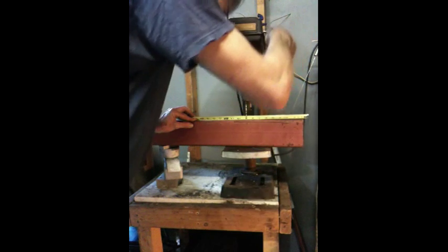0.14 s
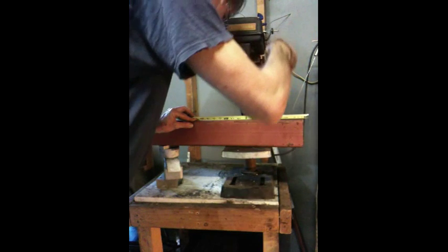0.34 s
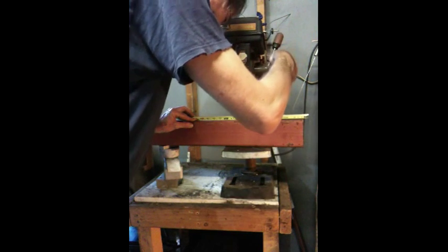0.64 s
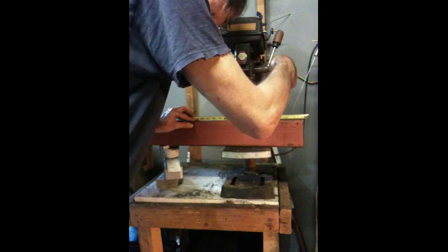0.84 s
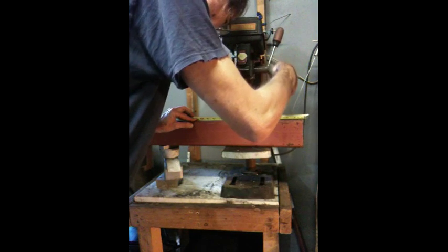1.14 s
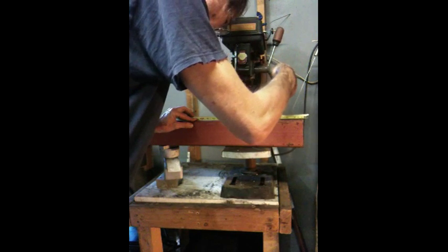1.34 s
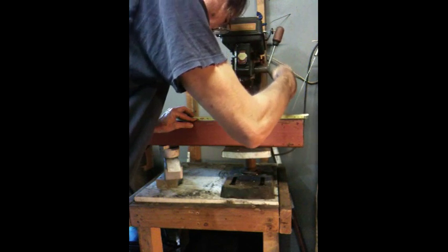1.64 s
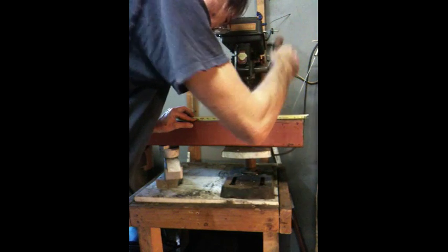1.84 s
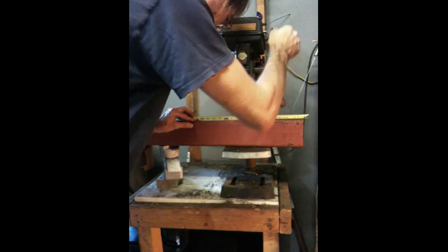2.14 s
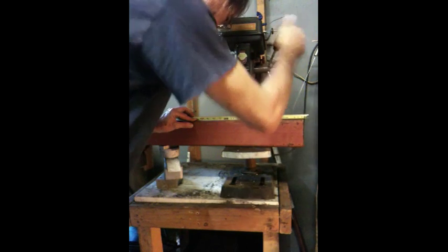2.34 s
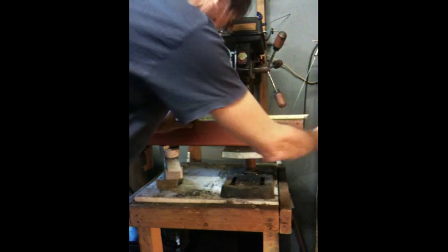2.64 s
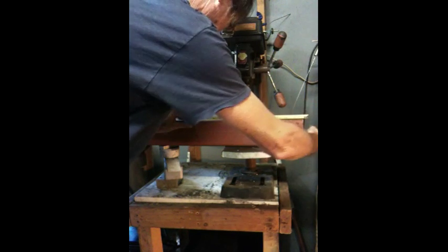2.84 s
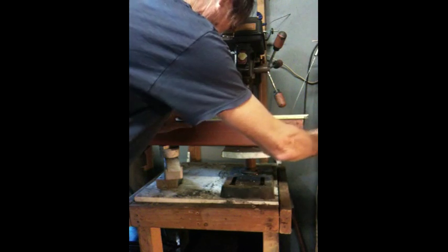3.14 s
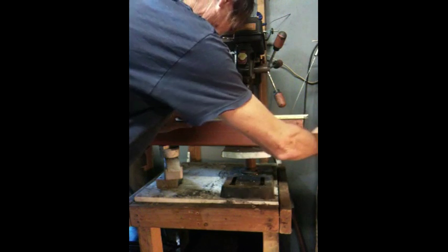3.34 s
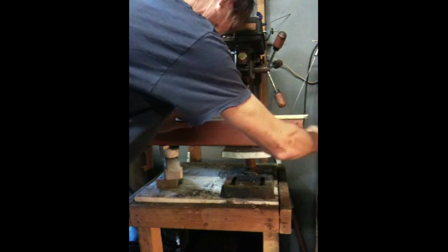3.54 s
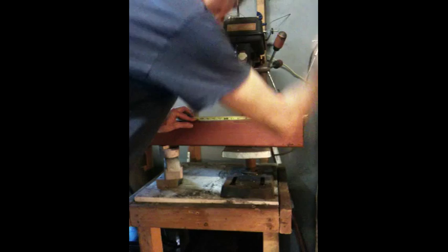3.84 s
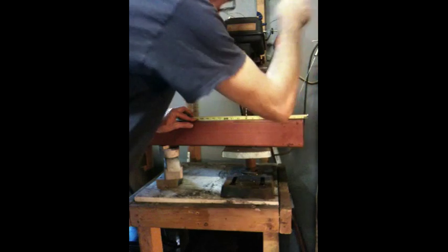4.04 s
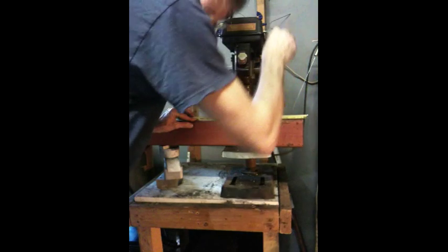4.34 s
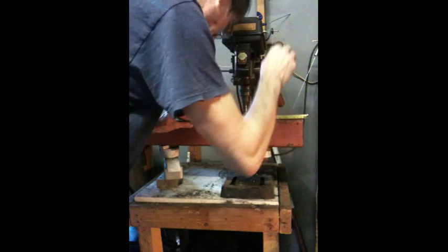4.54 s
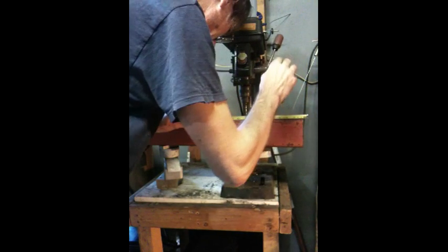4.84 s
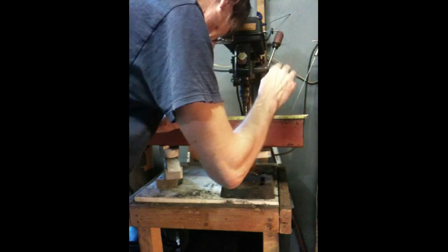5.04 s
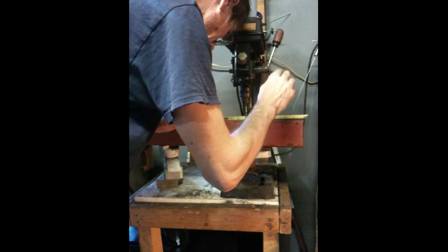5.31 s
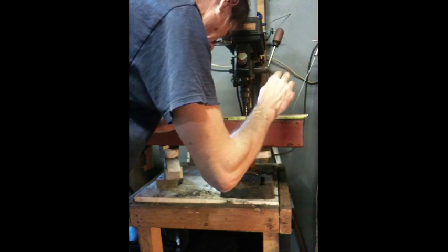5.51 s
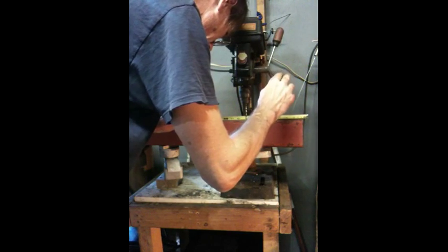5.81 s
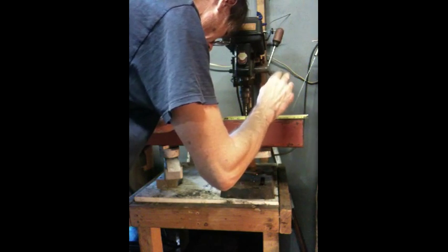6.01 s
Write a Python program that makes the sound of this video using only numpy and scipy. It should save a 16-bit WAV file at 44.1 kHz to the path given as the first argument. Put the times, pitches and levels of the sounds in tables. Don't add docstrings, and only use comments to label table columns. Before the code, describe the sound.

After a quick rattle and clank, a workshop motor hums and whooshes on without change, its housing ringing, with dull wooden thuds midway.

```python
import sys
import numpy as np
from scipy import signal
from scipy.fft import rfft, irfft
from scipy.io import wavfile
from scipy.ndimage import uniform_filter1d

SR = 44100
rng = np.random.default_rng(int(sys.argv[2]) if len(sys.argv) > 2 else 0)


def how_loud(loudness_db):
    steps = np.asarray(loudness_db, float) / 20
    return 10 ** steps


def waveform_to_disk(signal):
    frames = np.transpose(np.atleast_2d(signal))
    scaled = np.clip(frames, -1, 1) * 32767
    samples = np.round(scaled).astype(np.int16)
    wavfile.write(sys.argv[1], SR, samples)


N = 272097


# (frequency [Hz], width [Hz], level [dB])
HOUSING = [(646, 30, -4), (681.9, 20.7, 4.5), (700.4, 31.5, -2), (731.5, 36, -14)]
# (time [s], change [dB], length
# [s])
DRONE_SWELLS = [(0.009, 9, 0.016), (0.091, 14.5, 0.017), (0.328, 5.7, 0.027), (0.723, 8.5, 0.034),
                (0.883, 3, 0.061), (1.024, 7, 0.04), (1.107, 8.5, 0.048), (1.322, 4, 0.019), (1.493, 5.5, 0.03),
                (2.096, 3.7, 0.045), (2.241, 10, 0.012), (2.488, 4.5, 0.068), (2.547, 6, 0.026),
                (2.645, 3, 0.042), (2.733, 7.5, 0.017), (2.818, 4.3, 0.032), (3.122, 5, 0.071), (3.413, 2, 0.038),
                (3.484, 7.5, 0.085), (3.67, 6.5, 0.018), (3.765, 7.5, 0.1), (3.874, 7.7, 0.032),
                (3.973, 3, 0.046), (4.188, 5, 0.02), (4.32, 7, 0.089), (4.374, 3, 0.016), (4.716, 8, 0.042),
                (4.848, 4.3, 0.078), (5.211, 4.0, 0.038), (5.974, 6.5, 0.043),
                (0.036, 5, 0.013),
    (0.065, 19, 0.019),
    (0.072, -9, 0.0093),
    (0.175, 8, 0.011),
                (0.149, -7, 0.08), (0.473, -5.5, 0.08), (1.165, -1, .06), (1.285, -11, 0.033), (2.03, -4, 0.076),
         (2.4, -8, 0.064), (3.042, -6, 0.033), (3.223, -5, 0.046), (3.59, -4.5, 0.053), (4.877, -10, 0.024),
         (5.07, -10, 0.031), (5.39, -2.5, .13), (6.135, -3, 0.099)]


def housing_drone():
    rest_db, flutter_db, flutter_per_s = -46, 2, 14
    drone = steadied(rings(HOUSING), 0.056)
    moves_db = swells(DRONE_SWELLS)
    return drone * how_loud(rest_db + moves_db + flutter_db * drift(flutter_per_s))


# (multiple of the blade rate, level [dB])
BLADE_ORDERS = [(1, -71.5), (2, -59.5), (3, -67.5), (5, -52.5), (8, -108), (15, -64), (19, -78.5)]


def hum_and_blades():
    blade_hz, mains_hz, mains_db = 142.88, 119.95, -67.5
    t = np.arange(N) / SR
    turns = np.cumsum(blade_hz * (1 + .00012 * drift(2))) / SR
    blades = sum(how_loud(db) * np.cos(2 * np.pi * (k * turns + rng.random())) for k, db in BLADE_ORDERS)
    hum = how_loud(mains_db) * np.cos(2 * np.pi * mains_hz * t)
    return np.sqrt(2) * (blades + hum)


# (frequency [Hz], level [dB per Hz])
VENT = [(800, -65), (1100, -32), (1400, -17.5), (1750, -8), (2050, -1.5), (2250, -3), (2500, -10.5),
        (3000, -17), (3450, -20), (4000, -47)]
# (frequency [Hz], width [Hz], level against the whoosh [dB])
VENT_RINGS = [(1643, 11, -21), (1735, 54, -15), (1895, 32, -13.5), (2136, 15, -17), (2370, 24, -34),
              (3124, 60, -24.5)]
# (time [s], rise [dB], length [s])
PUFFS = [(0.029, 1.5, 0.065), (0.371, 1, 0.048), (1.097, 1.2, 0.11), (1.463, 1.2, 0.121),
         (1.93, 1.8, 0.079), (2.369, 1, 0.06), (2.581, 1.8, 0.076), (3.007, 0.5, 0.103), (3.279, 2, 0.085),
         (3.805, 1.5, 0.14), (4.117, 2, 0.11), (4.379, 2, 0.052)]


def vent_whoosh(gust):
    rest_db = -51
    whoosh = steadied(walls(tinted(VENT) + rings(VENT_RINGS)), 0.33)
    return whoosh * how_loud(rest_db + swells(PUFFS) + 0.42 * gust)


# (frequency [Hz], width [Hz], level [dB])
FRAME_RING = [
    (423.6, 23, 0),
]
# (time [s], rise [dB], length [s])
PANEL_SWELLS = [(0.056, 9.5, 0.091), (0.753, 5.5, 0.062), (0.908, 6, 0.13), (1.28, 4, 0.15),
                (1.417, 11, 0.053), (1.714, 7, 0.092), (2.878, 6, 0.054), (3.028, 8.5, 0.13),
                (3.169, 11, 0.14), (3.422, 9, 0.051), (3.748, 4, 0.064), (4.054, 4.5, 0.121),
                (4.274, 10, 0.1), (4.814, 7, 0.063), (5.263, 2, 0.08), (5.543, 7, 0.08)]


def loose_panel():
    rest_db = -61
    return steadied(rings(FRAME_RING), 0.035) * how_loud(rest_db + swells(PANEL_SWELLS))


# (frequency [Hz], level [dB], time to fall 60 dB [s])
LEVER = [(403, -8, 0.56), (453, -7, 0.15), (494, -7, 0.31), (658, 5.5, 0.19), (700, -19, .2),
         (2116, -13.5, 0.28), (2234, -14.5, 0.25), (2422, -14.5, 0.26), (2720, -33, 0.074),
         (3160, -24, 0.074), (3800, -20.5, 0.23), (3800, -22, 0.092), (4200, -22.5, 0.3), (4737, -26, .15)]
# (frequency [Hz], level [dB per Hz])
SCRAPE = [(150, -25), (550, -3), (1150, -15), (2200, -1.5), (4400, -5.5), (5500, -14), (9000, -22),
          (15600, -36)]


def clank(db, rise, bright_db):
    t = np.arange(SR // 2) / SR
    onset = 1 - np.exp(-t / max(rise, .001))
    ring = 0
    for hz, mode_db, t60 in LEVER:
        fade_db = mode_db + bright_db * (hz > 3000) - 60 * t / t60
        ring = ring + how_loud(fade_db) * np.sin(2 * np.pi * hz * t)
    scrape = how_loud(-11.0 + 0.37 * bright_db - 60 * t / 0.22) * tinted(SCRAPE, count=len(t))
    return how_loud(db) * onset * (ring + scrape)


# (time [s], level [dB], rise [s], brightness above 3 kHz [dB])
CLANKS = [
    (.001, -44, 0.0023, 15.5),
    (.05, -42.5, 0.0045, 8.5),
    (.202, -35, 0.0017, 6.5),
    (.211, -27, 0.006, -3),
]


def lever_clanks():
    return played(CLANKS, clank)


def thud(db, hz, glide):
    t = np.arange(SR // 5) / SR
    turns = np.cumsum(hz * (1 + glide * (1 - np.exp(-t / 0.029)))) / SR
    swell = t / .016
    shape = swell * np.exp(1 - swell)
    rustle = tinted([(60, -60), (140, -14), (200, -6.0), (400, -9), (600, -25)], count=len(t))
    body = np.sin(2 * np.pi * turns) + 0.2 * np.sin(2 * np.pi * 1.15 * turns)
    return how_loud(db) * (shape * body + 0.36 * shape ** .7 * rustle)


# (time [s], level [dB], pitch [Hz], upward glide [share])
THUDS = [
    (.045, -54, 294, .05),
    (.065, -47, 225, .05),
    (0.101, -61, 202, 0.042),
    (3.43, -52, 213, .05),
    (3.692, -46.5, 203, 0.33),
    (3.75, -43.5, 277, 0.06),
    (3.862, -43, 261, 0.22),
    (4.012, -49.5, 205.4, 0.39),
    (4.262, -49, 276, 0.073),
]


def bench_thuds():
    return played(THUDS, thud)


# (frequency [Hz], level [dB per Hz])
CLOTH = [(2500, -25), (4500, 0), (7000, -2), (10000, -11), (15600, -20)]


def swish(length, db):
    count = int(length * SR)
    return how_loud(db) * np.sqrt(np.hanning(count)) * tinted(CLOTH, count=8192)[:count]


# (time [s], length [s], level [dB])
SWISHES = [
    (0, 0.072, -50),
    (3.335, 0.09, -54.5),
]


def sleeve_swishes():
    return played(SWISHES, swish)


# (frequency [Hz], level [dB per Hz])
HISS = [(3300, -20.5), (3650, -2), (4250, -2), (4420, -4), (4850, -3), (4980, -7.5), (5300, -2.5),
        (5800, -3.5), (6100, -6.5), (6450, -5.5), (7000, -9), (10000, -16), (12500, -21.5), (15600, -21)]
# (time [s], level [dB])
HISS_DB = [
    (0.35, -54.5),
    (3.64, -54),
    (3.96, -53.5),
    (4.74, -54.5),
    (6.17, -54),
]


def air_hiss(gust):
    course_db = np.interp(np.arange(N) / SR, *np.transpose(HISS_DB))
    return how_loud(course_db + .25 * gust) * steadied(walls(tinted(HISS)), .3)


# (frequency [Hz], level [dB per Hz])
RUMBLE = [(20, -34), (45, -46), (100, -20), (150, -11.5), (230, -7.5), (380, -8), (500, -5), (750, 0),
          (950, -14.5), (1100, -33.5), (1400, -53)]
# (frequency [Hz], width [Hz], level [dB])
FRAME = [(190, 5, -76), (238, 11, -69), (331.5, 7, -62), (552, 36, -56.5), (940, 30, -76)]


def rumble():
    return how_loud(-52.5) * tinted(RUMBLE) + rings(FRAME)


def walls(x):
    t60, tail_db = .2, -17
    t = np.arange(SR // 2) / SR
    tail = rng.standard_normal(len(t)) * how_loud(-60 * t / t60) * (t > .004)
    tail = how_loud(tail_db) * tail / np.linalg.norm(tail)
    tail[0] = 1
    return signal.fftconvolve(x, tail / np.linalg.norm(tail))[:N]


def evened(x):
    return x / np.sqrt(np.mean(x ** 2) + 1e-20)


def tinted(points, count=N):
    hz, db = np.transpose(points)
    axis = np.fft.rfftfreq(count, 1 / SR) + 1
    gain = how_loud(np.interp(np.log(axis), np.log(hz), db, right=-90))
    return evened(irfft(rfft(rng.standard_normal(count)) * gain, count))


def rings(modes):
    axis = np.fft.rfftfreq(N, 1 / SR)
    total = np.zeros(N)
    for hz, width, db in modes:
        drive = rfft(rng.standard_normal(N))
        total += how_loud(db) * evened(irfft(drive / (1 + ((axis - hz) / (width / 2)) ** 2), N))
    return total


def steadied(x, s):
    count = int(s * SR)
    power = uniform_filter1d(uniform_filter1d(x ** 2, count), count)
    return x / np.sqrt(power + 1e-12)


def drift(per_s):
    knots = rng.standard_normal(400)
    return evened(np.interp(np.arange(N) / SR * per_s, np.arange(400), knots))


def swells(events):
    t = np.arange(0, N + 100, 100) / SR
    s, db, length = np.transpose(events)[:, :, None]
    bells = db * .5 ** (((t - s) * 2 / length) ** 2)
    return np.interp(np.arange(N) / SR, t, bells.sum(0))


def played(events, sound):
    track = np.zeros(N)
    for s, *how in events:
        one = sound(*how)
        part = track[round(s * SR):][:len(one)]
        part += one[:len(part)]
    return track


def scene():
    gust = drift(12)
    motor = housing_drone() + hum_and_blades() + vent_whoosh(gust) + loose_panel()
    hands = lever_clanks() + bench_thuds() + sleeve_swishes()
    background = air_hiss(gust) + rumble()
    return (motor + hands + background)[None]


# (frequency [Hz], level [dB])
DROPOUT = [(600, -14), (950, -9), (1150, -3.4), (1500, -7), (6500, -4.5), (9000, -2.4), (12500, -1.1),
           (15600, -1.4)]


def dropouts(x):
    hz, t, z = signal.stft(x, SR, nperseg=2048, noverlap=1536)
    power = uniform_filter1d(uniform_filter1d(abs(z) ** 2, size=5, axis=-2), size=5, axis=-1)
    usual = uniform_filter1d(np.median(power, axis=-1, keepdims=True), size=9, axis=-2)
    limit = how_loud(np.interp(hz, *np.transpose(DROPOUT)))[:, None] ** 2
    keep = np.where(power < limit * usual, .1, 1.)
    return signal.istft(z * keep, SR, nperseg=2048, noverlap=1536)[1][:, :N]


def low_pass(x):
    return signal.sosfilt(signal.butter(12, 15640, fs=SR, output="sos"), x)


def record(dry):
    bass_cut = signal.butter(1, 60, "highpass", fs=SR, output="sos")
    heard = dropouts(signal.sosfilt(bass_cut, dry))
    return low_pass(heard)


dry = scene()
out = record(dry)
waveform_to_disk(out)
```